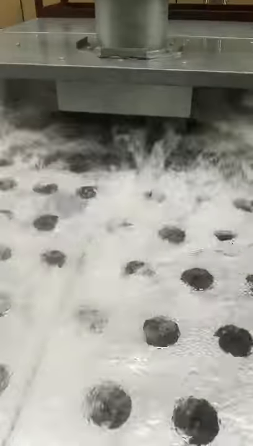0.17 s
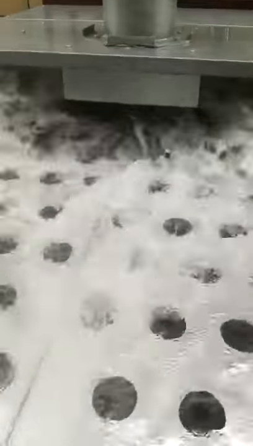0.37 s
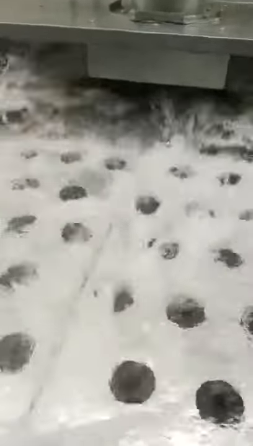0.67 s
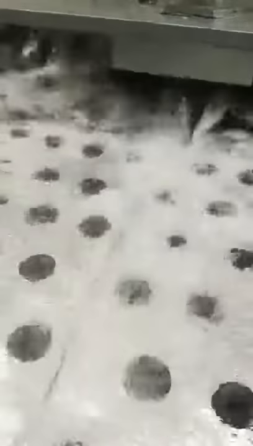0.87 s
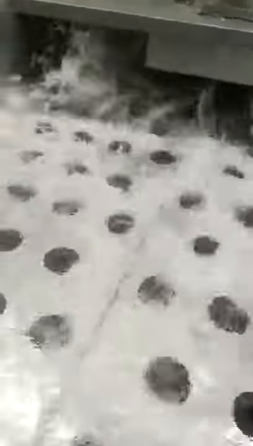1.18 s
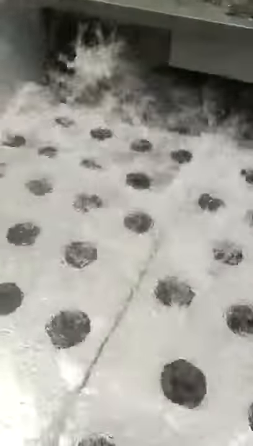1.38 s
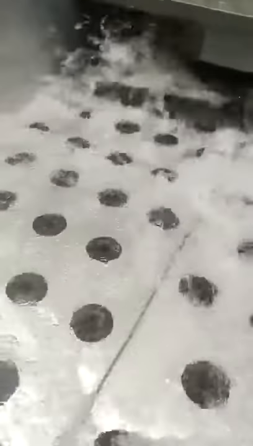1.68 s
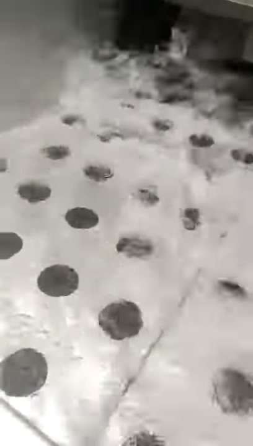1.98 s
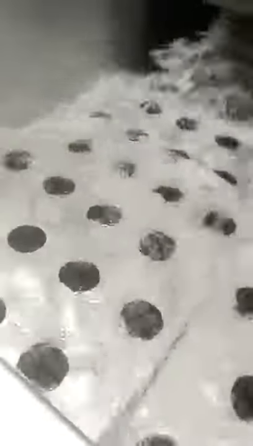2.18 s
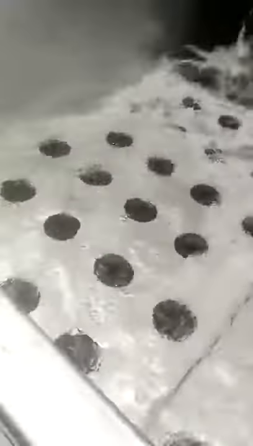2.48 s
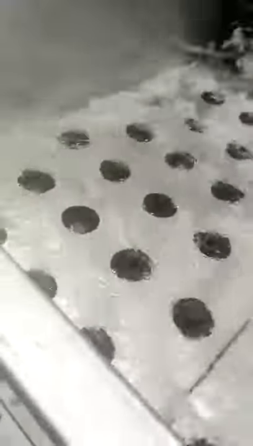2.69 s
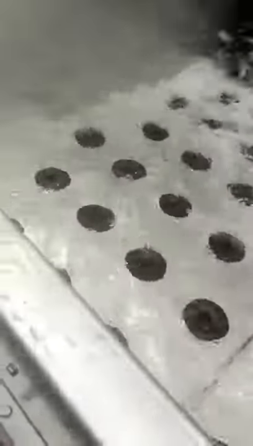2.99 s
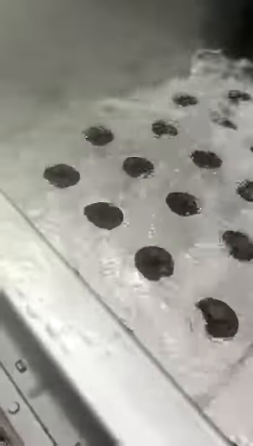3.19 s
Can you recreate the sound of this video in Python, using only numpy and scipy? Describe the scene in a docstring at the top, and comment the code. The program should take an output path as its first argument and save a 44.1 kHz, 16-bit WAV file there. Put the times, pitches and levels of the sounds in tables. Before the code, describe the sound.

Turbulent water pours steadily over a perforated steel basin and drains through its holes, with deep churning, bubbling and small splashes above a wavering low hum; close stereo microphone, quick fade-in.

```python
"""At a perforated steel basin, water pours hard onto the metal and drains through its holes, close to a two-port mic.
Noise and rising chirps, moved in level band by band, make the churn, tiny bubbles and spray; bursts make splashes.
A wavering low resonance and sine make the floor's drone, and three faint sines the motor whine.
The recorder fades in."""
import sys
import numpy as np
from scipy import signal
from scipy.fft import rfft, irfft, next_fast_len
from scipy.io import wavfile
from scipy.ndimage import uniform_filter1d

SR = 44100
rng = np.random.default_rng(int(sys.argv[2]) if len(sys.argv) > 2 else 0)


def pcm_store(signal):
    """Save signal as 16-bit PCM."""
    levels = np.round(np.clip(np.atleast_2d(signal), -1, 1) * 32767)
    wavfile.write(sys.argv[1], SR, levels.astype(np.int16).T)


N = 147294

# Motor tones: pitch_hz; then for each tone level_db, left_minus_right_db
WHINE_PITCHES = [4987, 5091, 5993]
WHINE_LEVELS = [(-50, 6.5), (-55, -8.5), (-59, 4.5)]
# Wavering of the basin floor's note: time_s, level_db (before steady and fuzzy parts are mixed)
DRONE_LEVELS = [(.3, -26), (.6, -25.5), (.85, -31), (1.0, -30), (1.2, -25), (1.45, -26), (1.6, -33),
                (2.2, -32), (2.36, -24), (2.6, -29), (3.0, -33), (3.34, -30)]
# Louder splashes: start_s, level_db (pop peak over the uncoloured rush), pop_pitch_hz
SPLASHES = [(0.2956, 4, 2000), (0.6939, 4, 2000), (1.0286, 5.5, 2200), (1.4372, -2, 2200),
            (1.8592, 6.5, 3420), (2.0985, -1, 2200), (2.8595, 1, 2200), (2.9902, 6.5, 2200),
            (3.102, 6, 2220)]
# Flow of the water, of which only the movement around each mean is used:
# time_s, deep_churn_db, upper_churn_db, rush_db, spray_db
FLOW_LEVELS = [(.1, -22, -26, -28, -31), (.25, -21, -24, -26.5, -29.5), (0.399, -21, -25.5, -24.5, -30),
               (.6, -22, -23, -31, -29.5), (.9, -22.5, -25.5, -26.5, -30.5), (1.15, -19.5, -25.5, -27, -30),
               (1.4, -23, -27, -27, -30), (1.7, -21, -24.5, -27, -30), (1.87, -19.5, -27, -25.5, -29),
               (2.1, -20, -24, -27.5, -30.5), (2.31, -23.5, -25.5, -27.5, -30),
               (2.37, -17.5, -28, -27, -30), (2.43, -21, -27.5, -26.5, -30.5), (2.7, -22, -26, -27, -31),
               (3.0, -20, -27, -26, -31), (3.25, -23, -26.5, -28, -31), (3.34, -23, -29, -26, -30.5)]
# Where each flow level holds: frequency_hz
FLOW_BANDS = [120, 300, 1300, 5000]
# Spectral shape of the whole rush: frequency_hz, density_db_per_hz (overall level is set later)
BASIN_COLOUR = [(20,-79), (27,-54), (35,-50), (47,-41), (58,-43), (70,-46), (110,-42), (140,-41),
                (165,-44.5), (190,-48), (255,-46), (275,-48), (294,-44.5), (330,-51), (358,-47.5),
                (390,-53.5), (500,-54.5), (650,-54), (780,-58.5), (1000,-58.5), (1250,-56.5), (1500,-56),
                (1800,-59), (2200,-61), (2800,-64.5), (3600,-65.5), (5000,-68), (6500,-70), (8500,-69.5),
                (10500,-70.5), (12000,-72), (14200,-74)]
# How the two ports hear the water: frequency_hz, likeness (0-1), right_lead_rad, left_minus_right_db
PORTS = [(30, .998, 0, 0), (70, .993, 0, .1), (170, .975, -.1, 0), (300, .9, 0, 1.4), (390, .64, .4, 1.3),
         (470, .38, 1.5, 1.5), (600, .66, 2.9, -1.1), (690, .5, 3.2, -3.1), (780, .3, 4.9, -1.0),
         (1000, .54, 6.4, 1.7), (1150, .5, 6.8, 1.3), (1600, .64, 6.4, 5.3), (1900, .4, 8.2, 6.3),
         (2300, .55, 9.2, 3.2), (2700, .46, 10.5, .8), (3200, .3, 11.8, .5), (3600, .45, 12.3, -1.9),
         (4000, .2, 14.0, -2.3), (5000, .18, 16.0, -3.3), (6500, .16, 18.0, -2.9), (8000, .16, 22.0, 1.0),
         (10000, .1, 26.0, 2.4), (12500, .1, 30.0, .6), (14300, .1, 33.0, .2)]

DRONE_HZ, DRONE_WIDTH_HZ, DRONE_FUZZ = 84.4, 6, .25  # fuzz is a share 0-1
EDGE_HZ = 14270  # top of the recorded band

# Bubbles: rate is per stream; spread is the mean of a random boost
BUBBLE_SHARE, BUBBLES_PER_S, BUBBLE_SPREAD_DB = 0.36, 9000, 2.5
BUBBLE_LOW_HZ, BUBBLE_CYCLES, BUBBLE_RISE = 803, 8.8, .1
SMALL_BUBBLE_BIAS = .8  # how strongly numbers grow with pitch

SPRAY_DECAY_S, SPRAY_RISE_S, POP_DECAY_S = .018, .004, .0005
SPRAY_DB = -6  # noise against pop, before the spray's envelope

PATCH_DB, RIPPLE_DB, SWELL_DB, GUST_DB = 0.62, 1.07, 0.17, 0.61  # RMS level movements
MIST_HZ, MIST_FADE_DB_PER_S = 7000, 0.77  # corner and limiting rate of the treble's dulling
FRAME, HOP = 512, 128  # samples
WATER_DB = -17.5  # RMS over both ports, before the fade

START_S, FADE_S, FADE_LEAD_S, FADE_POWER = 0.077, 0.32, 0.02, 1.02


def gain_of(db):
    """Amplitude factor for a level in dB."""
    return 10 ** (np.asarray(db) / 20)


def evened(x):
    """Scale to an RMS of one."""
    return x / np.sqrt(np.mean(abs(x) ** 2) + 1e-20)


def read(points, hz, column=1):
    """Read a table column along a log-frequency axis."""
    points = np.array(points)
    return np.interp(np.log(hz + 1), np.log(points[:, 0] + 1), points[:, column])


def resonate(x, hz, width):
    """Resonance of a given width: shift down, smooth with one pole, shift back."""
    turn = np.exp(2j * np.pi * np.cumsum(hz * np.ones(len(x))) / SR)
    pole = np.exp(-np.pi * width / SR)
    smooth = signal.lfilter([1 - pole], [1, -pole], x / turn)
    return 2 * (turn * smooth).real


def drifting(noise, frames):
    """Smooth noise over a number of frames, then restore unit RMS."""
    return evened(uniform_filter1d(noise, size=frames, axis=-1))


def whine():
    """Thin steady motor tones, each a sine panned between the ports."""
    t = np.arange(N) / SR
    out = np.zeros((2, N))
    for hz, (db, pan_db) in zip(WHINE_PITCHES, WHINE_LEVELS):
        ports = gain_of([[db + pan_db / 2], [db - pan_db / 2]])
        out += ports * np.sin(2 * np.pi * (hz * t + rng.random()))
    return out


def drone():
    """The basin floor hums on one low note, part steady sine and part resonant noise."""
    s, db = np.transpose(DRONE_LEVELS)
    t = np.arange(N) / SR
    fuzzy = evened(resonate(rng.standard_normal(N), DRONE_HZ, DRONE_WIDTH_HZ))
    steady = np.sqrt(2) * np.sin(2 * np.pi * (DRONE_HZ * t + rng.random()))
    return gain_of(np.interp(t, s, db)) * ((1 - DRONE_FUZZ) * steady + DRONE_FUZZ * fuzzy)


def splashes():
    """Each splash is a soft short pop and a swelling, bright burst of spray."""
    out, t = np.zeros(N + SR), np.arange(SR // 10) / SR
    for s, db, hz in SPLASHES:
        bright = np.diff(rng.standard_normal(len(t) + 1))
        spray = gain_of(SPRAY_DB) * evened(bright + rng.standard_normal(len(t)))
        spray *= (1 - np.exp(-t / SPRAY_RISE_S)) * np.exp(-t / SPRAY_DECAY_S)
        pop = np.sin(2 * np.pi * hz * t) * t / POP_DECAY_S * np.exp(1 - t / POP_DECAY_S)
        out[round(s * SR):][:len(t)] += gain_of(db) * (spray + pop)
    return out[:N]


def bubbles():
    """Thousands of short rising chirps, the small ones more numerous, weighted flat in spectrum."""
    boost_db = BUBBLE_SPREAD_DB * np.minimum(rng.exponential(1, N), 5)
    size = gain_of(boost_db) * (rng.random(N) < BUBBLES_PER_S / SR)
    pitches = np.geomspace(BUBBLE_LOW_HZ, EDGE_HZ, num=30)
    odds = pitches ** SMALL_BUBBLE_BIAS
    odds /= np.sum(odds)
    kind = np.searchsorted(np.cumsum(odds), rng.random(N))
    out = np.zeros(N)
    for k, hz in enumerate(pitches):
        cycles = np.arange(0, 3 * BUBBLE_CYCLES, hz / SR)
        age = cycles / BUBBLE_CYCLES
        envelope = (1 - np.exp(-2 * cycles)) * np.exp(-2 * age)
        chirp = envelope * np.sin(2 * np.pi * cycles * (1 + BUBBLE_RISE * age))
        chirp *= np.sqrt(hz / odds[k]) / np.linalg.norm(chirp)
        out += signal.oaconvolve(size * (kind == k), chirp)[:N]
    return evened(out)


def unrest(frames, hz):
    """Level field in dB: flow, drifting patches, narrow level ripples, swell, treble gusts and dulling."""
    t, flow = np.arange(frames) * HOP / SR, np.array(FLOW_LEVELS)
    levels = np.array([np.interp(t, flow[:, 0], c) for c in flow[:, 1:].T])
    levels -= levels.mean(axis=1, keepdims=True)
    # Crossfade weights of the flow bands at every frequency
    blend = np.array([np.interp(np.log(hz + 1), np.log(FLOW_BANDS), e) for e in np.eye(len(FLOW_BANDS))])
    field = blend.T @ levels

    # Broad and narrow random level movements, smoothed over (frequency bins, frames)
    for db, bins, span in [(PATCH_DB, 8, 14), (RIPPLE_DB, 2, 10)]:
        noise = rng.standard_normal((len(hz), frames))
        field += db * drifting(uniform_filter1d(noise, size=bins, axis=0), span)

    field += SWELL_DB * drifting(rng.standard_normal(frames), 40)
    treble = (1 - blend[0] - blend[1])[:, None]
    field += GUST_DB * treble * drifting(rng.standard_normal(frames), 8)
    # The finest hiss dulls as the microphone turns away
    mist = hz ** 2 / (hz ** 2 + MIST_HZ ** 2)
    return field - MIST_FADE_DB_PER_S * np.outer(mist, t - t.mean())


def rush():
    """One stream of pouring water: noise and bubbles mixed by power."""
    share = np.clip(BUBBLE_SHARE, 0, 1)
    return np.sqrt(1 - share) * rng.standard_normal(N) + np.sqrt(share) * bubbles()


def water():
    """Near water reaches both ports, far water makes them differ; all takes the basin's colour."""
    near, far = rush() + splashes(), rush()
    hz, _, z = signal.stft(np.array([near, far]), SR, nperseg=FRAME, noverlap=FRAME - HOP)
    z = z * gain_of(unrest(z.shape[2], hz))
    moving = signal.istft(z, SR, nperseg=FRAME, noverlap=FRAME - HOP)[1][:, :N]

    size = next_fast_len(N + 8192)
    near, far = rfft(moving, size)
    hz = np.fft.rfftfreq(size, 1 / SR)
    like = np.clip(read(PORTS, hz), 0, 1)
    lead, tilt = read(PORTS, hz, column=2), gain_of(read(PORTS, hz, column=3))
    right = (like * near + np.sqrt(1 - like ** 2) * far) * np.exp(1j * lead)
    # Divide by the mean port power so that the tilt leaves the colour alone
    colour = gain_of(read(BASIN_COLOUR, hz)) / np.sqrt((1 + tilt ** 2) / 2)
    pair = np.array([near * tilt, right]) * colour
    return gain_of(WATER_DB) * evened(irfft(pair, size)[:, :N])


def scene():
    """Whine and drone behind the close water."""
    return whine() + drone() + water()


def record(dry):
    """The recorder opens from silence partway up its fade-in, and cuts the top band."""
    t = np.arange(N) / SR
    fade = np.clip((t - START_S + FADE_LEAD_S) / FADE_S, 0, 1) ** FADE_POWER
    fade *= np.clip((t - START_S) / .003, 0, 1)  # 3 ms opening
    lowpass = signal.firwin(2047, EDGE_HZ, window=("kaiser", 10), fs=SR)
    return signal.oaconvolve(dry * fade, lowpass[None], "same")


dry = scene()
out = record(dry)
pcm_store(out)
```